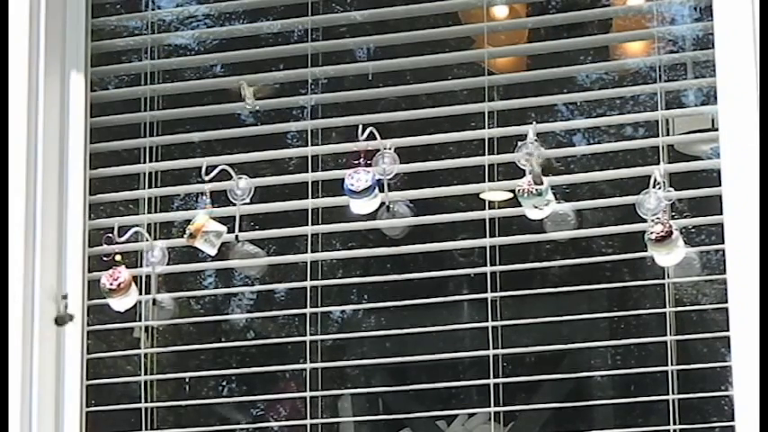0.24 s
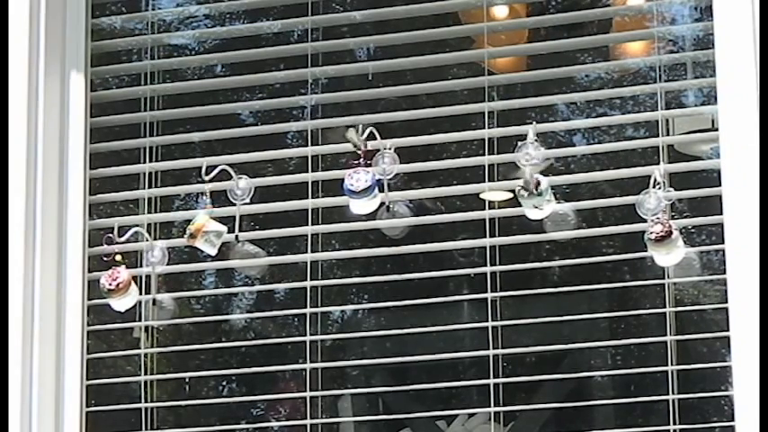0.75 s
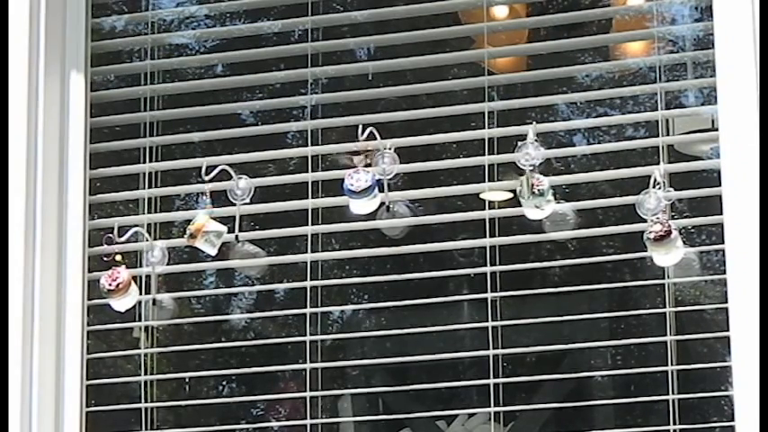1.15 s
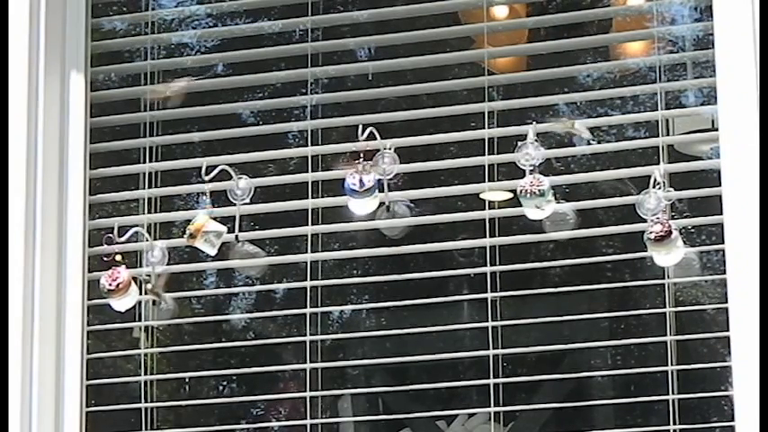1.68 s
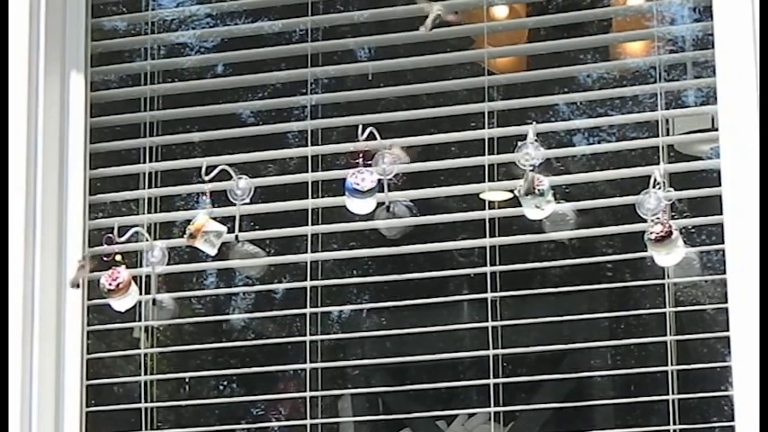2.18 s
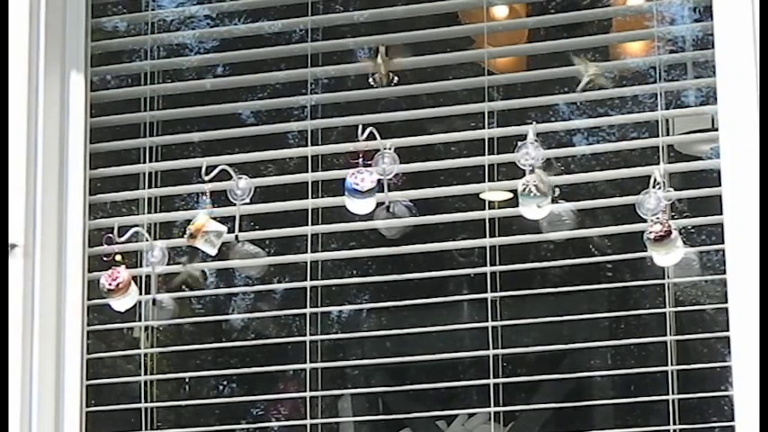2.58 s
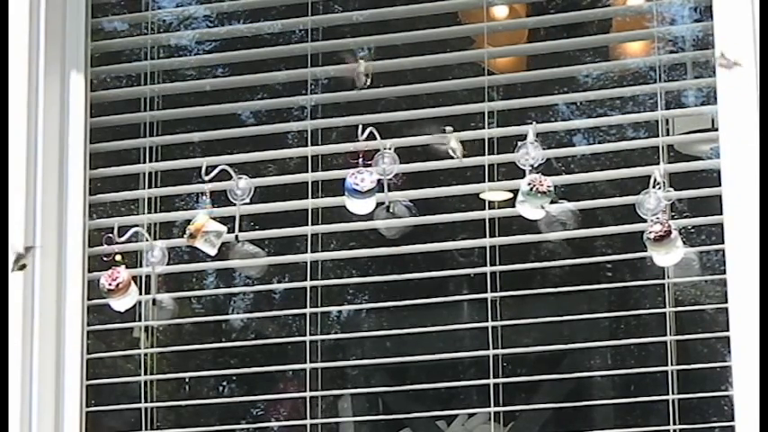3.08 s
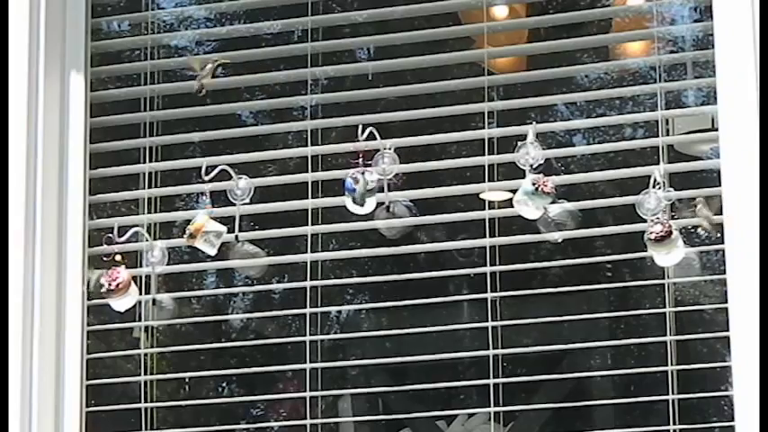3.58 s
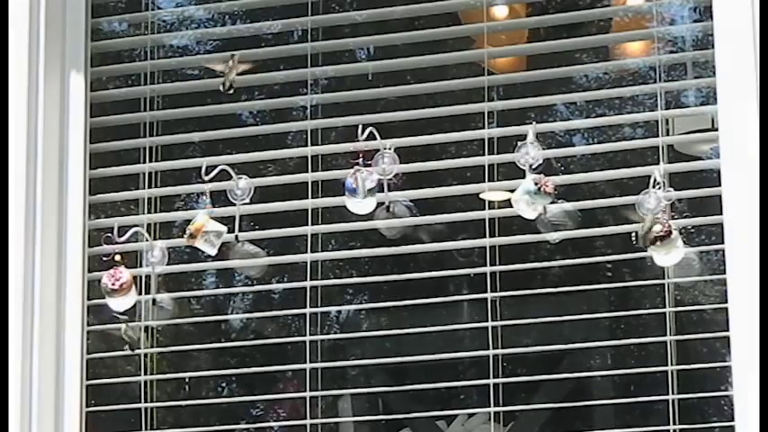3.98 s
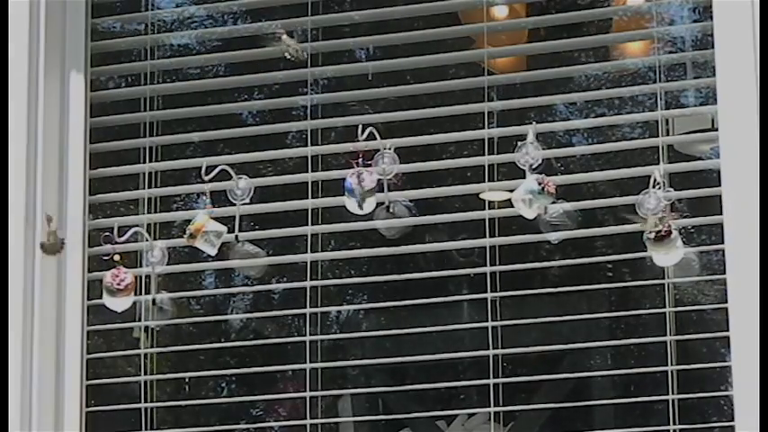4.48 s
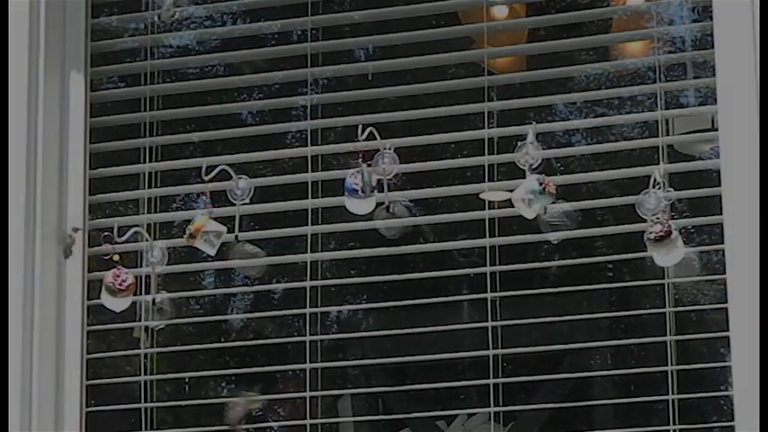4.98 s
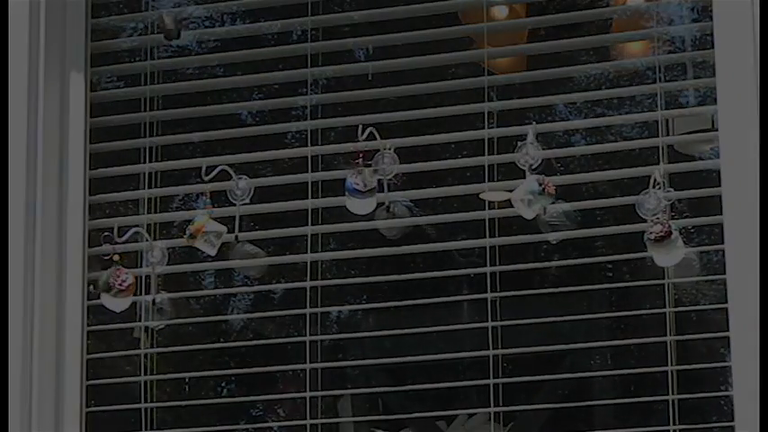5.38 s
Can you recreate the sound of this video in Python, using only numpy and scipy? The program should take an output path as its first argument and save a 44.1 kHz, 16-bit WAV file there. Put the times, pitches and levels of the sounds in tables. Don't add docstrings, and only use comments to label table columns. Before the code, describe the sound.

Close outdoor stereo pickup of tiny birds: dry, high chips dropping fast in pitch, brief scratchy buzzes, sparse thin whistles and faint far peeps. Calls arrive in three main flurries with quieter gaps, the last ending in a sharp squeal. Wings blur into soft low swells rather than clear flaps. Short reflections from house and trees, microphone hiss throughout, and a puff of air thumping late, stronger on the right.

```python
import sys
import numpy as np
from scipy import signal
from scipy.fft import rfft, irfft
from scipy.io import wavfile
from scipy.ndimage import uniform_filter1d

SR = 44100
rng = np.random.default_rng(int(sys.argv[2]) if len(sys.argv) > 2 else 0)


def nominal_scale(level):
    x = np.asarray(level, float) / 20
    return 10 ** x


def store_wav(level_fs):
    pcm = np.round(np.clip(np.atleast_2d(level_fs), -1, 1) * 32767)
    wavfile.write(sys.argv[1], SR, pcm.T.astype(np.int16))


N = 249165

# start_s, length_s, first_pitch_hz, last_pitch_hz, level_db
FALLING_CHIPS = [(0.056, 0.028, 3000, 2210, -51), (0.146, 0.018, 2830, 1744, -46.5),
                 (0.206, 0.03, 2690, 1674, -48), (0.303, 0.024, 2770, 1720, -48.5),
                 (0.42, 0.025, 2490, 1740, -56), (1.223, 0.028, 2750, 2080, -51.5),
                 (1.358, 0.021, 3030, 2310, -54), (1.408, .022, 4410, 1843, -43.5),
                 (1.468, .016, 3900, 2220, -46), (1.516, .019, 4060, 1880, -45),
                 (1.574, 0.018, 3920, 1727, -46), (1.664, 0.021, 3880, 1790, -46.5),
                 (2.893, 0.024, 2850, 1730, -49), (2.946, 0.021, 2745, 1660, -51),
                 (3.01, .024, 2620, 1604, -48.5), (3.312, .03, 2560, 1405, -52),
                 (4.804, .02, 3350, 1770, -49), (4.861, .023, 4210, 1735, -45.5),
                 (4.912, 0.016, 4190, 2330, -45), (4.964, 0.018, 3910, 2110, -44),
                 (5.033, .016, 3860, 2165, -43.5), (5.099, .022, 3460, 1670, -45.5),
                 (5.353, 0.026, 2720, 1770, -53.5)]
# start_s, length_s, level_db, dullness_db (per harmonic)
ROUGH_BUZZES = [
    (0.038, 0.038, -53, -0.4),
    (1.341, 0.038, -52, -0.5),
    (2.664, 0.008, -61, 0.2),
    (2.698, 0.02, -61.5, 0.45),
    (2.785, 0.033, -63, 0.2),
    (3.109, 0.043, -58.5, 0.6),
    (4.662, 0.027, -65, 0.05),
    (4.779, 0.037, -50.5, -1.14),
]
# time_s, upper_pitch_hz, lower_pitch_hz, upper_db, lower_db
TWO_VOICED_SQUEALS = [
    [(2.165, 3830, 3756, -70, -72), (2.18, 3720, 3640, -59, -53), (2.192, 3650, 3100, -48.5, -55),
     (2.204, 3470, 2553, -49, -50), (2.214, 3615, 2625, -49, -48.5), (2.224, 3943, 3010, -45, -48),
     (2.234, 3210, 2984, -47.5, -56), (2.246, 2230, 2800, -66, -57), (2.256, 1900, 2780, -76, -66)],
    [(5.135, 3627, 3570, -75, -82), (5.152, 3850, 3750, -54, -62), (5.165, 3720, 3450, -46, -48),
     (5.178, 3760, 3206, -49, -40), (5.192, 4076, 3197, -44, -45), (5.2, 4000, 3210, -43, -46),
     (5.21, 3330, 3110, -50, -44), (5.216, 2680, 2800, -54, -58), (5.228, 1900, 2770, -70, -70)],
]
# sum_tone_start_db, sum_tone_growth_db, hiss_db, flicker_db
VOICE_COUPLING = [
    (3, 10, -6.5, -1.5),
    (-9.5, 17, -11.5, 0.5),
]
# time_s, pitch_hz, level_db
CLOSE_WHISTLES = [
    [(2.567, 6340, -66), (2.571, 6460, -48), (2.598, 6640, -41.5), (2.613, 6570, -47), (2.626, 6770, -43),
     (2.644, 6370, -51), (2.66, 6380, -53), (2.67, 6400, -64), (2.73, 6550, -68)],
    [(4.558, 6120, -64), (4.568, 6180, -48), (4.586, 6460, -64), (4.6, 6500, -74)],
]
# start_s, length_s, first_pitch_hz, last_pitch_hz, level_db
FAR_PEEPS = [
    (.57, .08, 7150, 7700, -64),
    (1.04, .026, 7250, 7000, -63),
    (1.072, 0.051, 7100, 7030, -66),
    (1.226, 0.028, 7400, 6900, -65),
    (1.802, .06, 7380, 7300, -64),
    (4.342, 0.031, 6780, 6710, -60),
    (4.394, .03, 6690, 6700, -66),
]
# frequency_hz, gain_db
THROAT_COLOUR = [(1400, -9), (1900, -4), (2500, 0.5), (3100, -5), (3700, -5), (4350, -6), (5400, -3),
                 (6400, -4), (7800, -1.5), (9500, -6), (11500, -13.5), (14500, -29)]
# left_delay_s, right_delay_s, level_db
GARDEN_ECHOES = [(.0011, .0014, -11), (.0037, .0031, -14), (.0068, .0075, -16), (.020, .021, -10),
                 (.043, .045, -14)]
# time_s, swing_hz, build_up_s, fade_s, peak_db
PORT_PUFFS = [
    [(4.692, 96, 0.012, .0062, -20.5), (4.894, 81, .014, 0.026, -32)],
    [(4.671, 90, 0.0105, 0.0075, -15.8), (4.6942, 90, 0.0035, 0.0078, -17.5), (4.78, 65, .010, .010, -33),
     (4.888, 62, .012, 0.016, -35)],
]
# middle_s, half_length_s, level_db, upper_against_lower_hum_db
WING_FLYBYS = [(0.064, 0.057, -46.5, -8), (0.276, 0.094, -49, -6), (0.506, 0.026, -55.5, 1),
               (0.727, 0.071, -51, -1), (1.246, 0.021, -59, 4), (1.462, 0.17, -53.5, -0.5),
               (1.89, 0.062, -53.5, -1), (2.297, 0.29, -60.5, 5), (2.657, 0.043, -57, 5.5),
               (3.0, 0.73, -59, 2.5), (3.758, 0.031, -49, -2.5), (3.937, 0.083, -58.5, 6.5),
               (4.217, 0.078, -52, -1), (4.542, 0.042, -60, 15.5), (4.777, 0.091, -47.5, -5),
               (4.977, 0.046, -54, 1), (5.246, 0.052, -53, -2), (5.497, 0.084, -53, -1)]
# lower_hum_db, upper_hum_db
FAR_HUM_DB = (-58, -62.5)
# frequency_hz, density_db (per Hz)
HISS_COLOUR = [(20, -54), (45, -36), (90, -5.5), (150, -14), (280, -12.5), (500, -17.5), (1000, -21.5),
               (1800, -22), (4200, -27.5), (8200, -30), (12000, -33.5), (15700, -38.5)]
# frequency_hz, likeness (0-1)
STEREO_LIKENESS = [(60, 0.22), (220, 0.55), (500, 0.02), (1500, 0.08), (4000, 0.27), (9000, 0.15),
                   (15000, 0.)]

NEAR_DB = -46


def on_log(hz, table):
    f, v = np.transpose(table)
    return np.interp(np.log(np.maximum(hz, 1)), np.log(f), v)


def turns(hz):
    return 2 * np.pi * np.cumsum(hz) / SR


def walk(rate_hz, size=N):
    k = max(int(SR / rate_hz), 1)
    noise = rng.standard_normal(size + 2 * k)
    smooth = uniform_filter1d(uniform_filter1d(noise, k), k)[k:k + size]
    return smooth * np.sqrt(1.5 * k)


def curves(table):
    s, *columns = np.transpose(table)
    t = np.arange(s[0], s[-1], 1 / SR)
    return [uniform_filter1d(np.interp(t, s, c), size=70) for c in columns]


def add(out, s, sound, pan_db=0.):
    i = int(s * SR)
    out[:, i:i + len(sound)] += sound * nominal_scale(np.array([[pan_db], [-pan_db]]) / 2)


def stack(hz, first_db, rest_db, fall_db, flicker_db, count):
    phase = turns(hz)
    lead = rng.uniform(0, 2 * np.pi, count)
    k = np.arange(1, count + 1)[:, None]
    flicker = np.tanh([walk(360, len(hz)) for _ in k])
    db = np.where(k == 1, first_db, rest_db - fall_db * (k - 2))
    db = db + on_log(k * hz, THROAT_COLOUR) + flicker_db * flicker
    audible = k * hz < .45 * SR
    return np.sum(nominal_scale(db) * audible * np.sin(k * phase + lead[:, None]), axis=0)


def breath(size, tilt_db):
    f = np.arange(size // 2 + 1) * SR / size
    colour_db = on_log(f, THROAT_COLOUR) + tilt_db * np.log2(f / 4000 + .01)
    air = irfft(rfft(rng.standard_normal(size)) * nominal_scale(colour_db) * (f > 1500), size)
    return air / air.std()


def chips(out):
    for s, length, first_hz, last_hz, db in FALLING_CHIPS:
        overtone_db = db - 1.3 + 0.57 * (db - NEAR_DB)
        u = np.linspace(0, 1, int(length * SR))
        hz = (first_hz + (last_hz - first_hz) * u) * (1 + .012 * walk(580, len(u)))
        chip = stack(hz, db, overtone_db, fall_db=0.5, flicker_db=3.5, count=5)
        chip += nominal_scale(overtone_db - 6.5) * breath(len(u), tilt_db=0.0)
        add(out, s, np.sin(np.pi * u ** 1.1) ** 0.2 * chip, pan_db=-0.1)


def buzzes(out):
    for s, length, db, dull_db in ROUGH_BUZZES:
        rough = 0.294 + 0.0834 * (NEAR_DB - db)
        u = np.linspace(0, 1, int(length * SR))
        pulse_hz = 980 * (1 + 0.0576 * rough * walk(520, len(u)))
        tone = stack(pulse_hz, 0, 0, dull_db, flicker_db=8.0, count=14)
        tone = tone * nominal_scale(5.5 * rough * walk(880, len(u)))
        buzz = tone / tone.std() + 2.0 * rough * breath(len(u), tilt_db=-4.0 * dull_db)
        add(out, s, nominal_scale(db) * np.sin(np.pi * u) ** 0.31 * buzz, pan_db=1.0)


def squeals(out):
    for table, (start_db, growth_db, hiss_db, flicker_db) in zip(TWO_VOICED_SQUEALS, VOICE_COUPLING):
        upper_hz, lower_hz, upper_db, lower_db = curves(table)
        size = len(upper_hz)
        mean_db = (upper_db + lower_db) / 2
        both = nominal_scale(mean_db)
        sum_db = mean_db + start_db + growth_db * np.linspace(0, 1, size) ** 2.7
        a, b = (turns(hz * (1 + 0.0036 * walk(320, size))) for hz in (upper_hz, lower_hz))
        tone = np.zeros(size)
        for db, phase in ((upper_db, a), (lower_db, b), (sum_db, a + b)):
            flicker = flicker_db * np.tanh(walk(400, size))
            tone += nominal_scale(db + flicker) * np.sin(phase)
        tone += both * (nominal_scale(-13) * np.sin(2 * a - b) + nominal_scale(-18) * np.sin(2 * b - a) + nominal_scale(-12) * np.sin(2 * b))
        orders = (2 * a + b, a + 2 * b, 3 * a, 3 * b, 2 * a + 2 * b, a + 3 * b, 3 * a + b)
        high = sum(np.sin(phase) * (.5 + walk(900, size)) for phase in orders)
        tone += both * (nominal_scale(hiss_db - 8.5) * high + nominal_scale(hiss_db) * breath(size, tilt_db=1.0))
        add(out, table[0][0], 1.31 * tone, pan_db=-3.5)


def whistles(out):
    for table in CLOSE_WHISTLES:
        hz, db = curves(table)
        octave_db = db - 10 + 21 * (hz - hz[0]) / 1000.
        phase = turns(hz * (1 + 0.0028 * walk(140, len(hz))))
        tone = nominal_scale(db) * np.sin(phase) + nominal_scale(octave_db) * np.sin(2 * phase)
        flutter = nominal_scale(1.5 * np.tanh(walk(90, len(hz))))
        add(out, table[0][0], 1.17 * tone * flutter, pan_db=-1.5)


def peeps(out):
    for s, length, first_hz, last_hz, db in FAR_PEEPS:
        u = np.linspace(0, 1, int(length * SR))
        hz = first_hz + (last_hz - first_hz) * u
        phase = turns(hz * (1 + 0.0018 * walk(140, len(u))))
        swell = np.sin(np.pi * u ** .7) ** 1.3
        add(out, s, 1.05 * nominal_scale(db) * swell * np.sin(phase), pan_db=-11.0)


def garden(dry):
    t60_s, tail_db = 0.44, -6
    t = np.arange(SR // 2) / SR
    decay = np.exp(-np.log(1000) * t / t60_s) * np.minimum(t / 0.0039, 1)
    tail = rng.standard_normal((2, len(t))) * decay
    response = nominal_scale(tail_db) * tail / np.sqrt(np.sum(tail ** 2, axis=1, keepdims=True))
    response[:, 0] = 1
    for left_s, right_s, db in GARDEN_ECHOES:
        response[[0, 1], [int(left_s * SR), int(right_s * SR)]] += nominal_scale(db)
    return signal.fftconvolve(dry, response, axes=1)[:, :N]


def puffs():
    out = np.zeros((2, N))
    t = np.arange(N) / SR
    for port, rows in enumerate(PORT_PUFFS):
        for s, swing_hz, build, fade, peak_db in rows:
            shape = np.exp(-((t - s) / np.where(t < s, build, fade)) ** 2)
            out[port] -= nominal_scale(peak_db) * shape * np.cos(2 * np.pi * swing_hz * (t - s))
    return out


def pair(gain):
    f = np.arange(N // 2 + 1) * SR / N
    alike = np.clip(on_log(f, STEREO_LIKENESS), 0, 1)
    mid, side = rfft(rng.standard_normal((2, N))) * gain(f)
    x = irfft(np.sqrt(1 + alike) * mid + np.sqrt(1 - alike) * side * np.array([[1], [-1]]), N)
    return x / x.mean(axis=0).std()


def rumble():
    hum_hz, width_hz = (90.2, 203.8), (44.5, 58.7)
    middle, half, db, upper_db = np.transpose(WING_FLYBYS)[:, :, None]
    near = np.exp(-((np.arange(0, N, 64) / SR - middle) / half) ** 2)
    out = np.zeros((2, N))
    for k, far_db in enumerate(FAR_HUM_DB):
        swell = np.sqrt(nominal_scale(2 * far_db) + np.sum(nominal_scale(2 * (db + k * upper_db)) * near, axis=0))
        swell = np.interp(np.arange(N) / 64, np.arange(len(swell)), swell)
        out += swell * pair(lambda f: np.exp(-((f - hum_hz[k]) / width_hz[k]) ** 2))
    return out


def hiss():
    scan_hz, scan_db, top_hz = 15734, -85, 15775
    scan = np.sqrt(2) * nominal_scale(scan_db) * np.sin(turns(np.full(N, scan_hz)))
    level_db = -51 + .3 * walk(2.0)
    noise = pair(lambda f: nominal_scale(on_log(f, HISS_COLOUR)) * (f > 15) * (f < top_hz))
    return nominal_scale(level_db) * noise + scan


def scene():
    birds = np.zeros((2, N))
    for voice in (chips, buzzes, squeals, whistles, peeps):
        voice(birds)
    return garden(birds) + puffs() + rumble() + hiss()


def top_cut(x):
    return signal.sosfilt(signal.butter(12, 15840, fs=SR, output="sos"), x)


def record(dry):
    mix = dry * nominal_scale(np.array([[-.3], [.3]]))
    return top_cut(mix)


dry = scene()
out = record(dry)
store_wav(out)
```